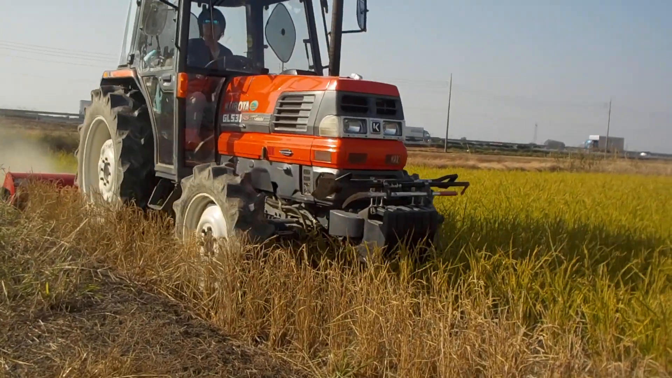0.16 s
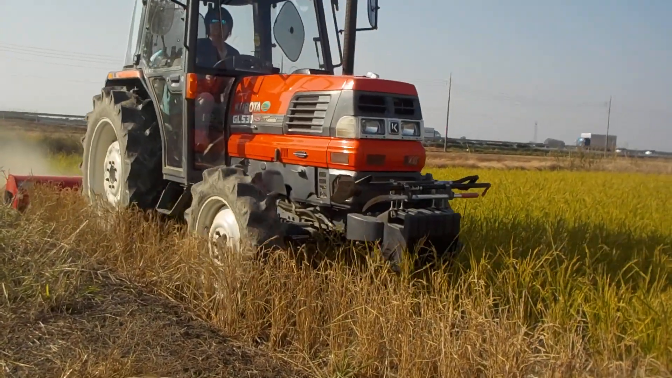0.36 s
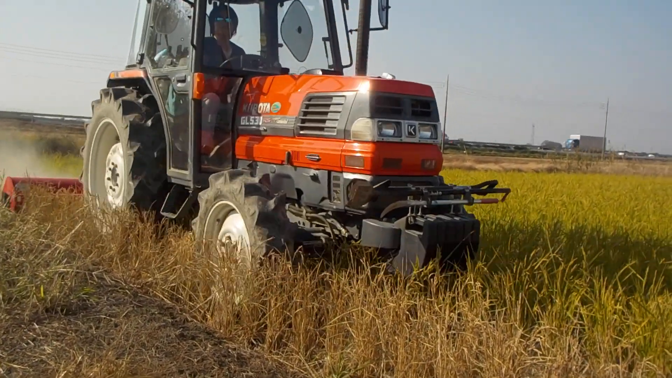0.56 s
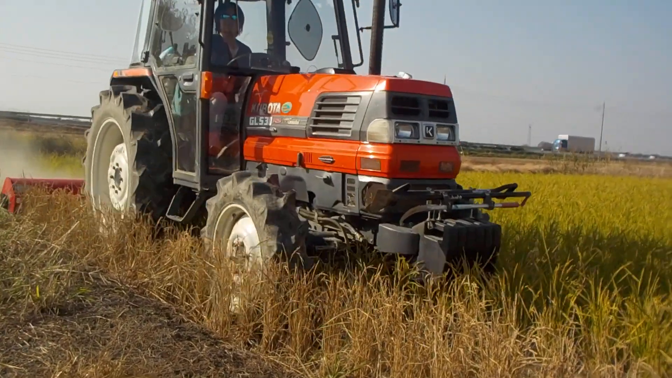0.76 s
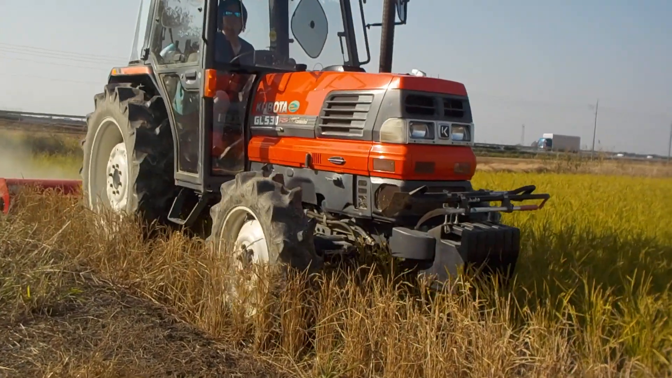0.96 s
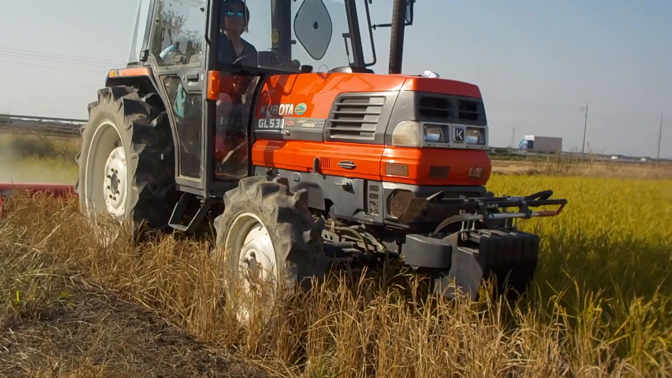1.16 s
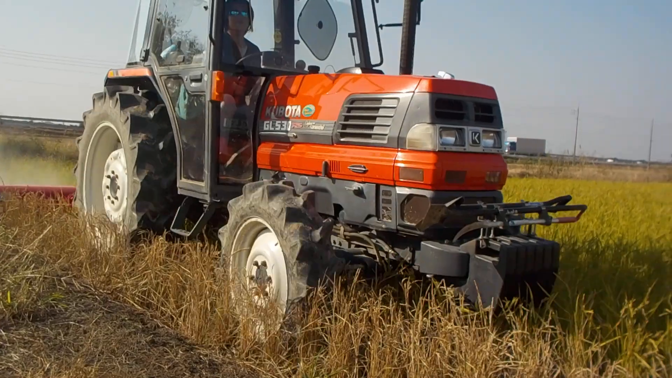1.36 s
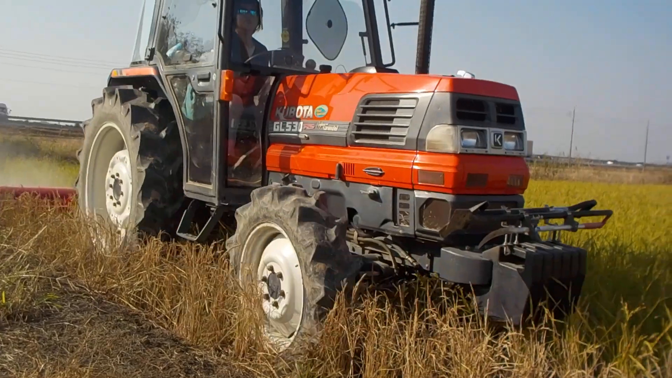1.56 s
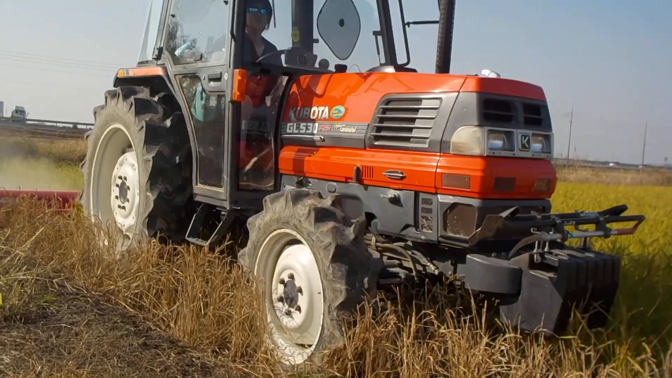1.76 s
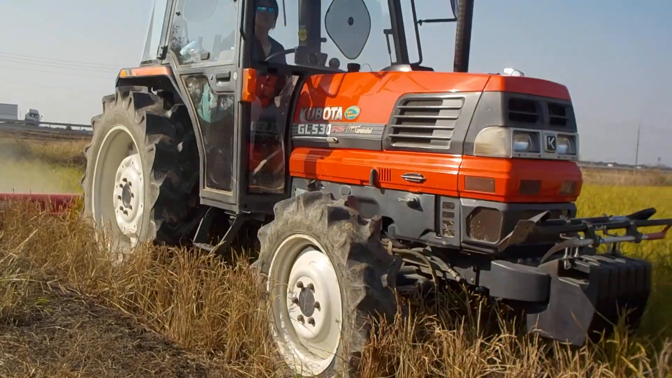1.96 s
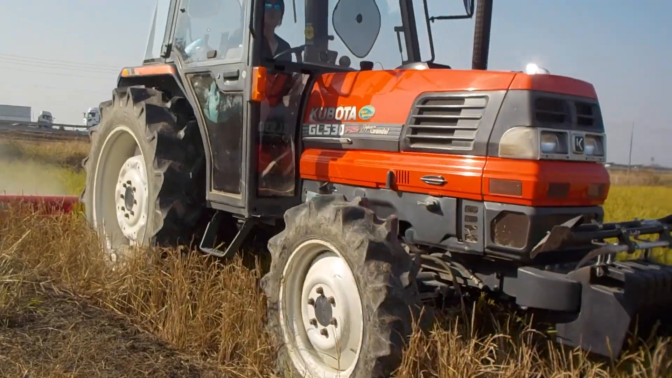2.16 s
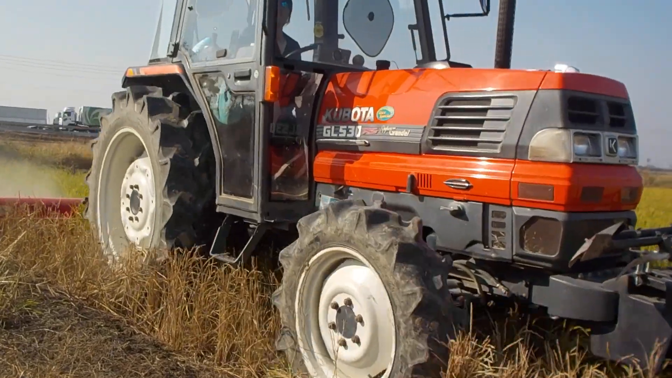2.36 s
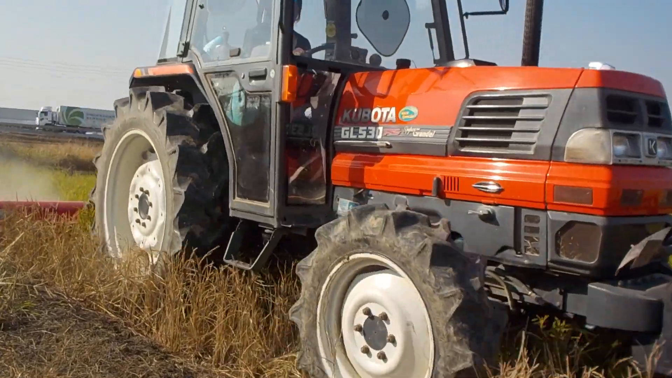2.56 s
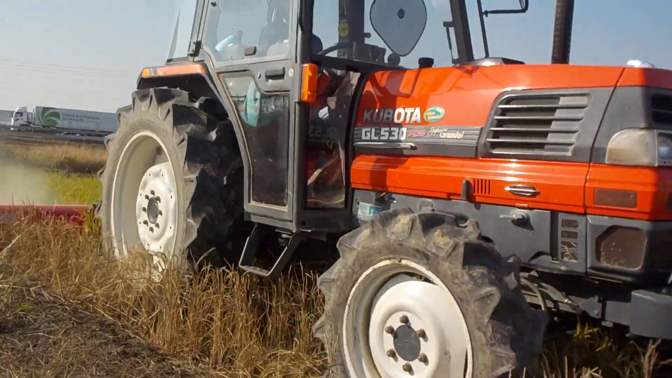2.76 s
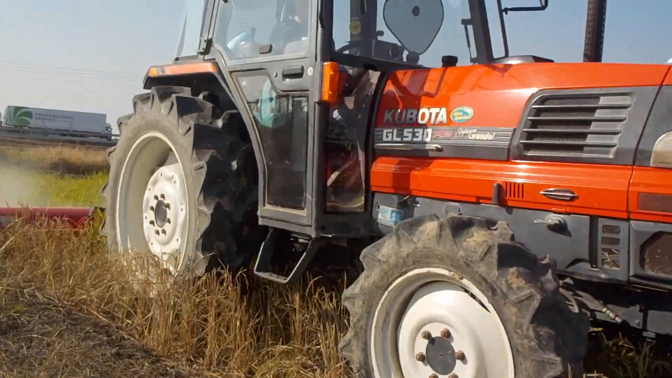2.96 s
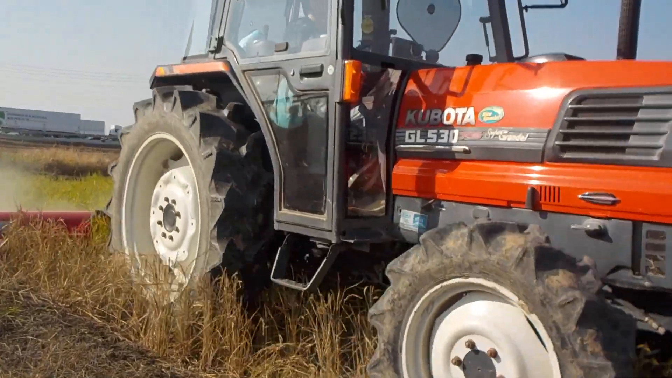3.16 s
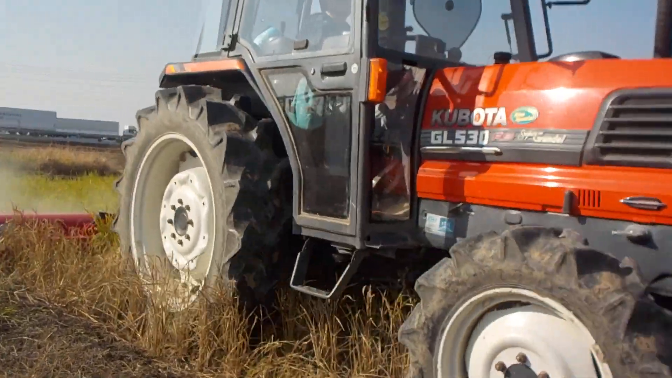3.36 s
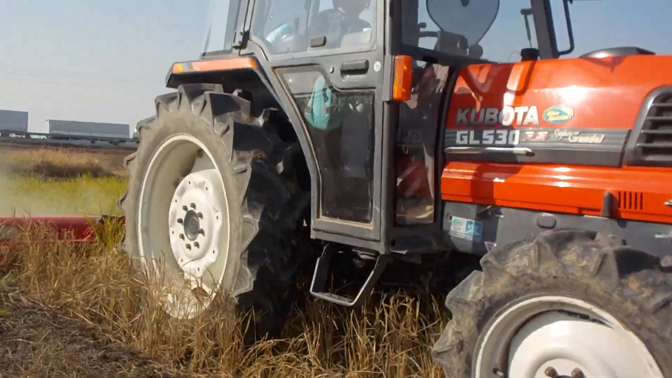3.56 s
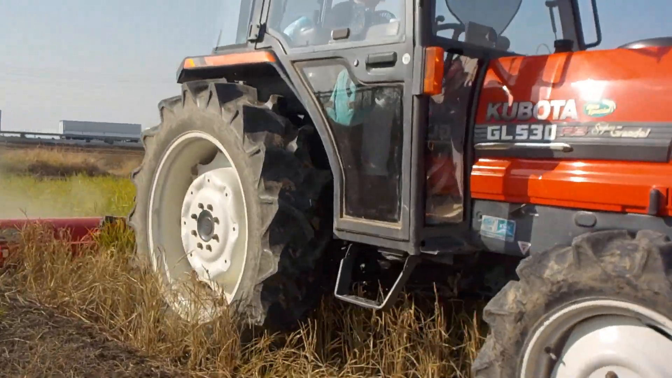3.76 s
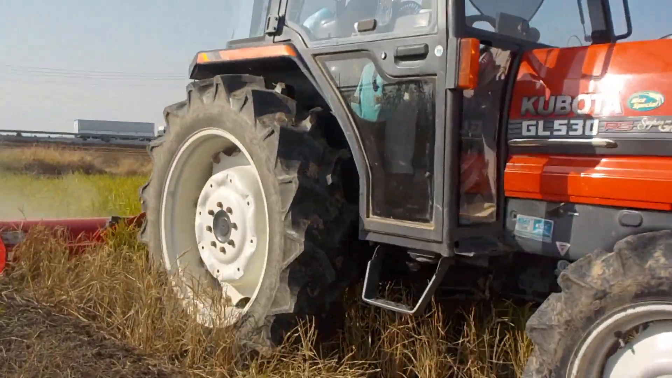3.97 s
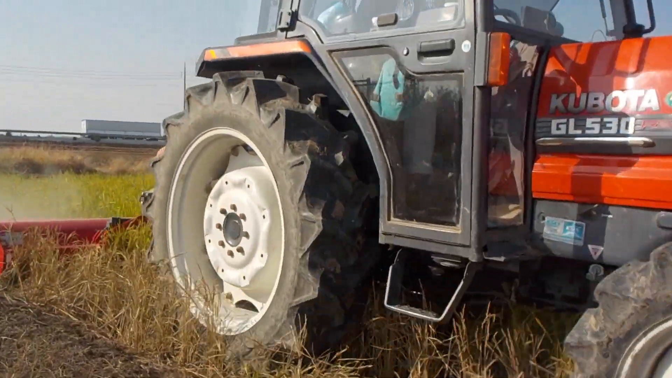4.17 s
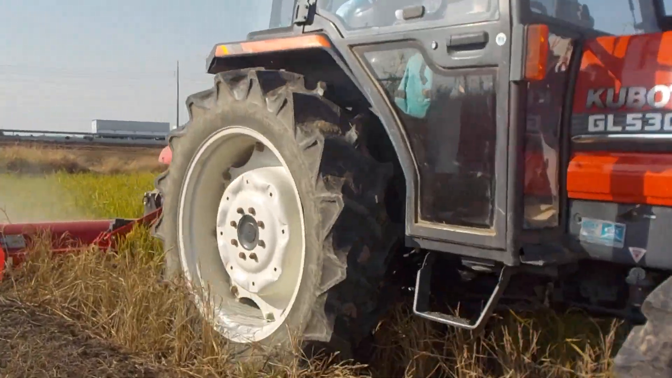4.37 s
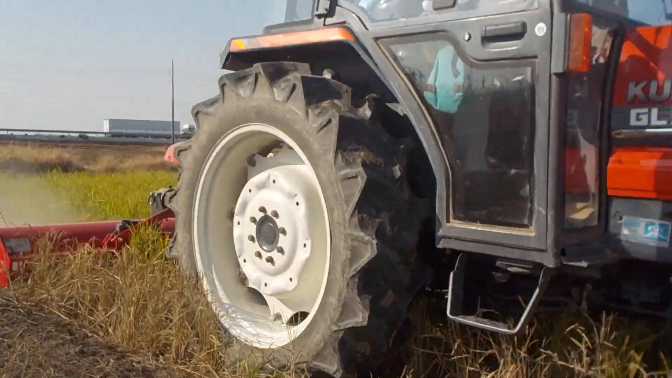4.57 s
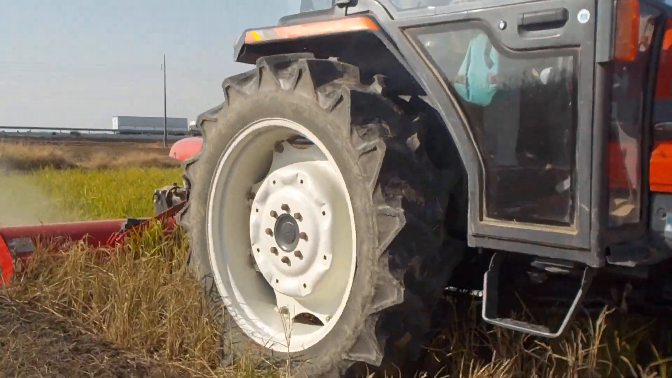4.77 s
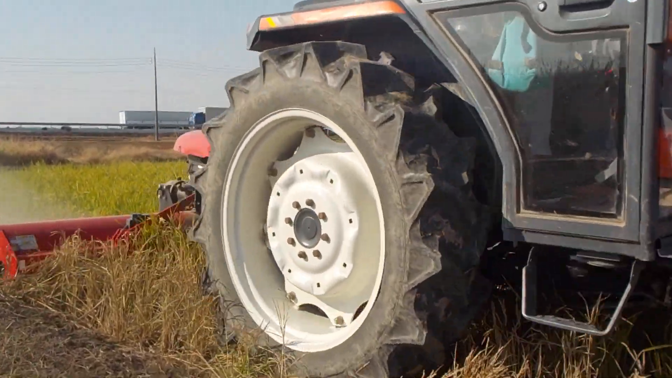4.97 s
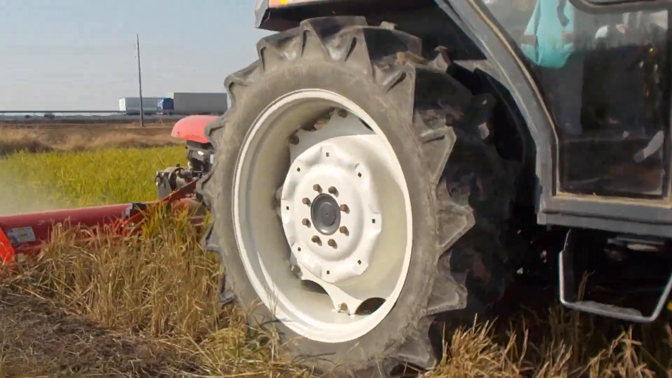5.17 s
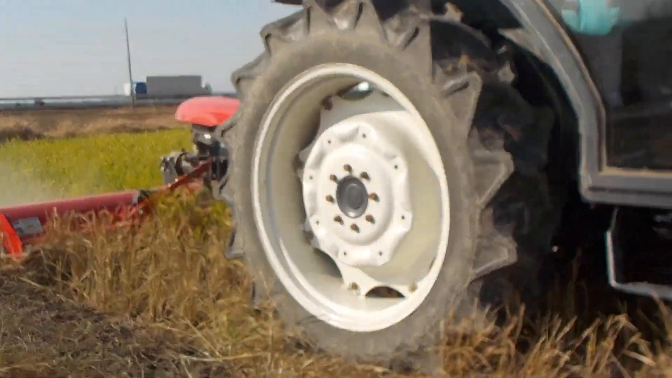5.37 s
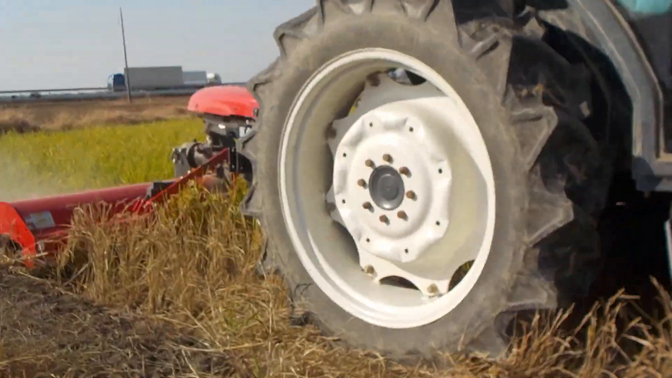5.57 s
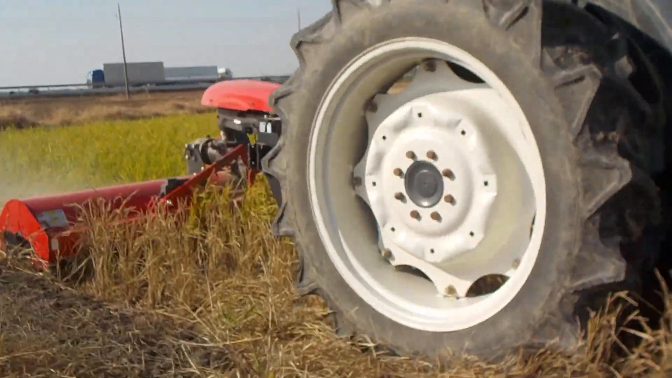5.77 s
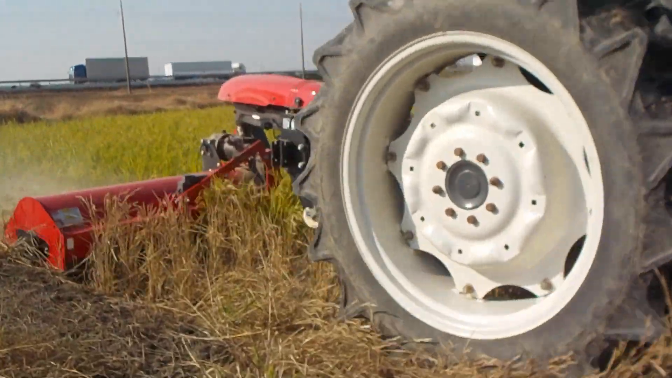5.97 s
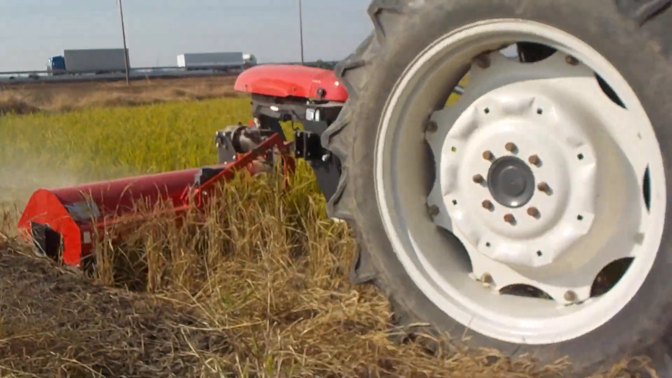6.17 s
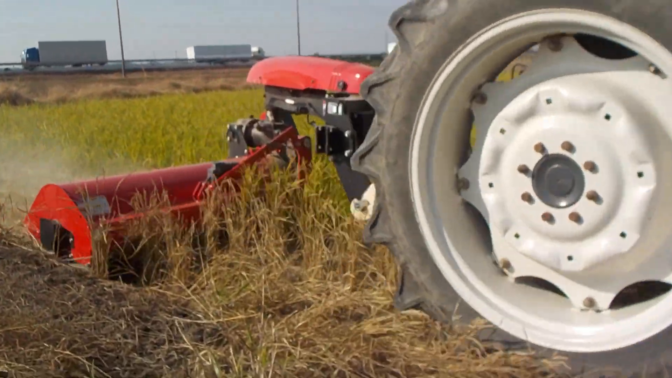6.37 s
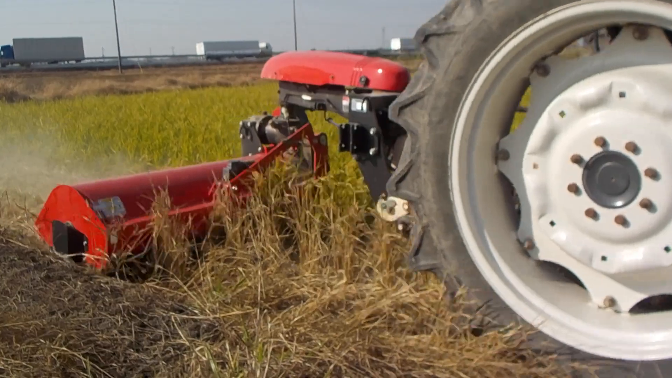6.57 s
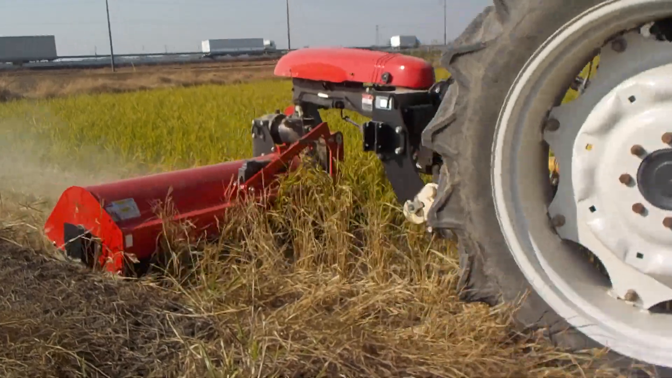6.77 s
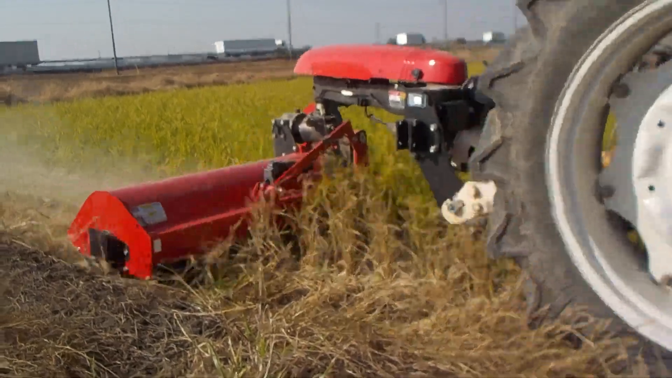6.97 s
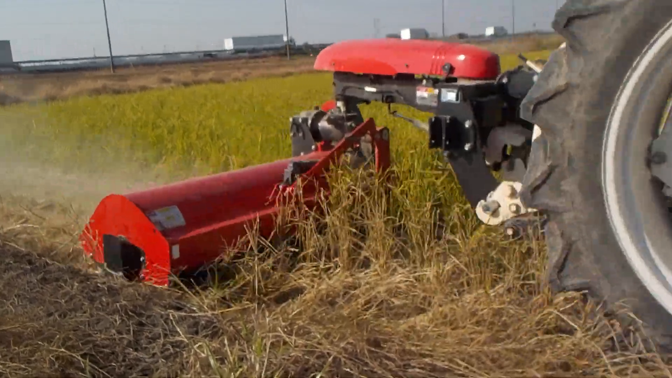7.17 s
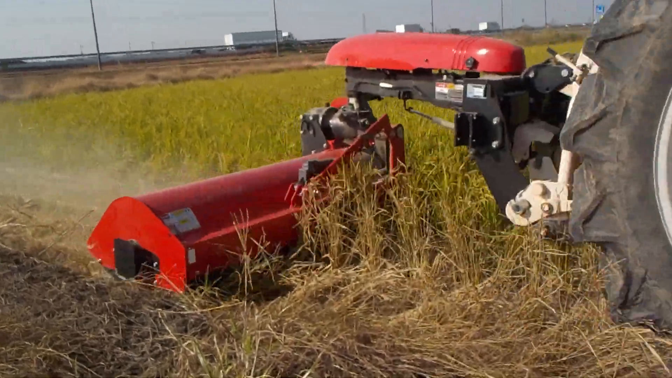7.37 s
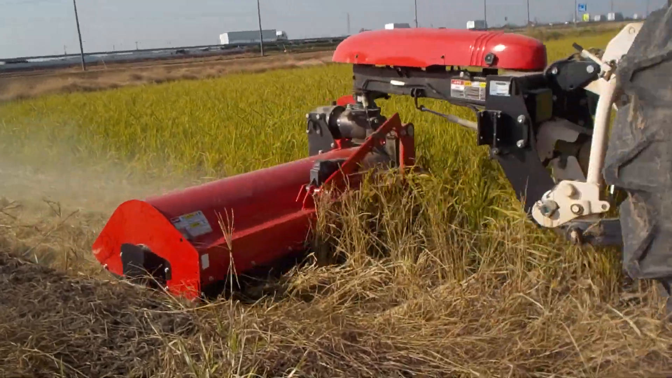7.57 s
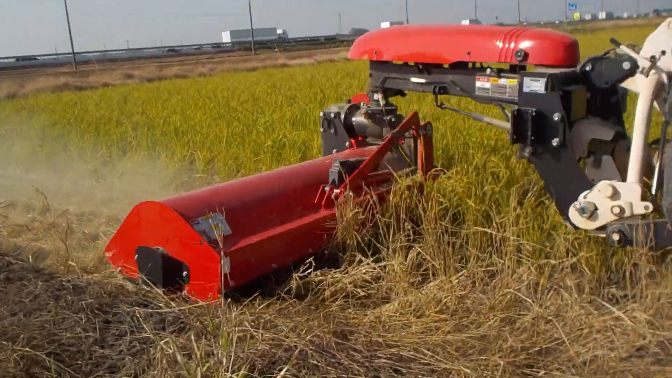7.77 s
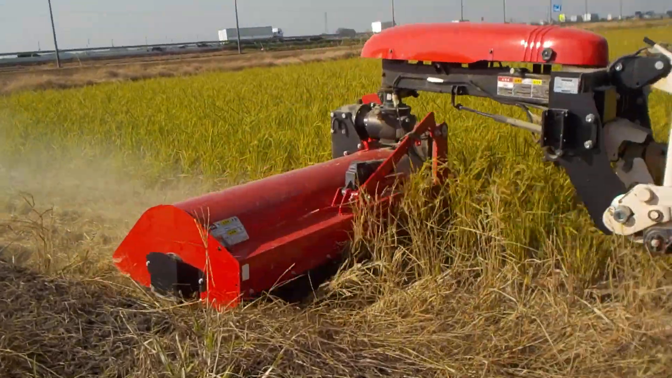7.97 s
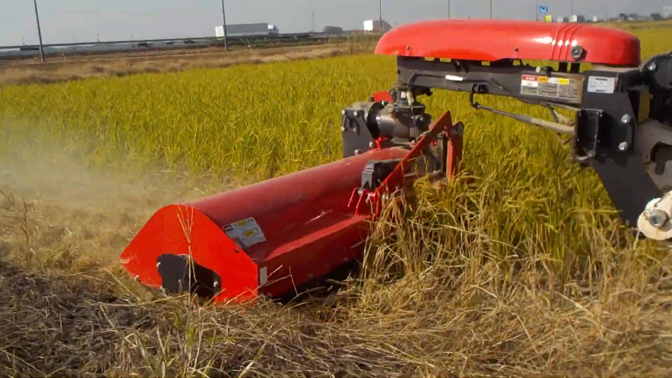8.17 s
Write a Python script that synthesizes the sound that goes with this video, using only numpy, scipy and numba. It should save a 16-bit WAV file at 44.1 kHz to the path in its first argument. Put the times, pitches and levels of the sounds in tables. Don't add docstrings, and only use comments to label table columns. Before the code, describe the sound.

A low, hollow engine drone with a fast mechanical hum comes first, the mower's thin hissing rasp behind it. As the tractor rolls by, gear tones come and go, and the shredding rises to a piercing, gritty roar with airy straw swish. Irregular sharp snaps crowd in, clipping and briefly ducking the sound. Outdoors, close handheld microphone, stereo, dry, no echo.

```python
import sys
import numpy as np
from scipy import signal
from scipy.fft import rfft, irfft, next_fast_len
from scipy.io import wavfile
from scipy.ndimage import uniform_filter1d, map_coordinates
from numba import njit

SR = 44100
rng = np.random.default_rng(int(sys.argv[2]) if len(sys.argv) > 2 else 0)


def inscribe(sig):
    pcm = np.round(np.clip(np.atleast_2d(sig).T, -1, 1) * 32767)
    wavfile.write(sys.argv[1], SR, pcm.astype(np.int16))


def field_ratio(decibels):
    return 10 ** (np.asarray(decibels, dtype=float) / 20)


N = 362943

# time in seconds, flail row rate in Hz.
ROTOR = [
    (0, 143.85),
    (1.5, 143.6),
    (3, 142.85),
    (4.5, 142.65),
    (7.3, 142.7),
    (8.23, 143.4),
]
ROW_BITE_DB = [7, 3, 4.5, 3]
# time in seconds, level in dB.
CUTTING = [(0, -30.5), (1, -28.3), (2, -26), (2.9, -25), (3.7, -24.5), (4.25, -21), (4.7, -21.5),
           (5.1, -19.5), (5.4, -20), (5.7, -18.5), (6.2, -18.9), (6.6, -18), (7.4, -19), (7.7, -19),
           (8.23, -19)]
# time in seconds, dB
BLOWS = [(0.1218, -10), (1.1504, -7.5), (1.921, -18), (2.3042, -4), (2.88, -10), (2.9034, -6.5),
         (3.2114, -6.5), (3.54, -5.5), (3.7557, -7.0), (4.0378, -2), (4.2094, 1), (4.3668, 2.1),
         (4.5144, -6), (4.5372, 0.5), (4.5713, 4.5), (4.5988, 4), (4.619, 1), (4.9, 3),
         (5.0837, 1.9), (5.127, 0), (5.2763, 0.5), (5.3227, 4), (5.35, 3.5), (5.4334, 3.5),
         (5.489, 6), (5.5177, 3), (5.679, 0.5), (5.7414, 2), (5.7975, 5), (5.8839, 0.5),
         (5.9387, -2), (5.9655, 4), (5.9941, 4.5), (6.0485, 4.2), (6.1284, 2), (6.2102, 2.5),
                   (6.2177, 1), (6.2677, 2.5), (6.3225, 0), (6.3315, 5), (6.4246, -2), (6.4852, 4),
                   (6.6377, 0), (6.7306, 1.4), (6.792, 2.5), (6.8754, 2), (7.0004, 0.5), (7.0419, -1),
                   (7.101, 4.5), (7.263, 3.5), (7.3806, 2.5), (7.4017, 2.5), (7.544, 2), (7.5987, 5.0),
                   (7.6596, 4.0), (7.7709, 2.1), (7.883, 2), (8.0168, 5), (8.1574, 4.5), (8.2126, 2.5)]
BUILD_UP = [0.28, 0.17, 0.13, 0.14, 0.13, 0.09]
# pitch in Hz, density in dB per Hz.
CHOP = [(1410, -58), (2400, -90), (2690, -35), (3000, -40), (3290, -20.5), (3730, -7), (3990, 1), (4140, 3),
        (5090, -11.5), (5980, -14.5), (6990, -13), (7370, -21.5), (7720, -34.5), (8050, -59), (8300, -51.5),
        (10800, -68), (18300, -120)]
# pitch in Hz, density in dB per Hz.
SWISH = [(4590, -32), (7800, -5.5), (8110, -18), (8610, -12), (9110, -15), (10600, 4), (11200, 4.5),
         (13700, -16), (15900, -26)]
# pitch in Hz, density in dB per Hz.
TICK = [(6000, -56), (8300, -14), (10500, -7), (12000, 2.5), (14000, 10.5), (15800, 7)]
# time in seconds, drone level in dB.
DIESEL = [(0, -37), (1.15, -35), (3.3, -33.3), (4.4, -33), (5.8, -31.5), (6.6, -32), (7.5, -33.5),
          (8.23, -31)]
# pitch in Hz, density in dB per Hz.
DRONE = [(24, -77), (40, -55), (64, -44), (113, -38), (135, -25), (168, -20.5), (296, -16), (336, -16.5),
         (411, -7.5), (684, -1), (736, -2.5), (1640, -6.5), (1970, -12), (2400, -36.5), (3100, -27.5),
         (4030, -47), (6820, -120)]
# pitch in Hz, level in dB.
ENGINE_ORDERS = [(76, -78), (108, -74), (253, -64.5), (290.7, -60), (310, -64)]
# pitch in Hz, loudest moment in seconds, half span in seconds, level in dB.
GEARS = [(698.4, 1.306, 1.6, -43.5), (645, 3.4, .9, -45), (828, 4.6, 0.65, -43.5), (906, 5.62, 1.05, -43.5),
         (588, 6.9, 1.3, -42), (416, 6.3, 1.73, -45)]
# pitch in Hz, density in dB per Hz.
HISS = [(9000, -40), (12000, -14), (13500, 0), (16000, 2)]
# pitch in Hz, left-right likeness from 0 to 1.
ALIKE = [(60, .75), (120, .88), (250, .86), (500, .993), (1000, .984), (2000, .94), (4000, .885),
         (8000, .78), (13000, .6)]
# pitch in Hz, left minus right in dB.
LEAN = [(60, -.7), (130, -3), (290, -.2), (1000, -1), (2400, 0), (4200, -1.2), (7000, 2), (12000, 1)]
# centre in Hz, half width in Hz, depth in dB.
DEAD_BANDS = [(2410, 60, -6), (2980, 120, -3), (8060, 170, -9), (8960, 80, -3)]

KNOCK_HZ, SHAFT_HZ = 146.285, 15.5
UNBALANCE_DB = .6
HUM_DB, HUM_SHARE, HOOD_DB, HOOD_SHARE, AIR_DB, AIR_SHARE = -37.5, 0.66, -12.5, 0.64, -32, 0.98
TURN_S, TURN_LOSS_DB, DRIFT_DB = 6.5, 1.5, -.12
ROAR_SHARE, ROAR_TOP_HZ = .45, 4700
CEILING_DB, BLOW_GROWS = -3.5, 0.77
RING_HZ = 4150
CRACK, CRACK_HZ = .9, 4900
TICK_DB, TICK_GROWS = -44.5, 3.6
GEAR_FALL_DB = 6
HISS_DB = -70
WIND_CUT_HZ, TOP_HZ = 28, 15800


def unit(x):
    return x / np.sqrt(np.mean(x ** 2) + 1e-20)


def along(points, hz):
    f, v = np.transpose(points)
    return np.interp(np.log(hz + 1), np.log(f + 1), v)


def curves(rows):
    s, *cols = np.transpose(rows)
    t = np.arange(N) / SR
    return [np.interp(t, s, c) for c in cols]


def wobble(rate):
    knots = rng.standard_normal(int(N * rate / SR) + 4)
    return map_coordinates(knots, [np.arange(N) * rate / SR])


def follower(offset_db, share):
    chop_db, = curves(CUTTING)
    return chop_db.mean() + offset_db + share * (chop_db - chop_db.mean())


def causal(spectrum, size=4096):
    level = field_ratio(along(spectrum, np.fft.rfftfreq(size, 1 / SR)))
    cepstrum = irfft(np.log(level + 1e-6))
    cepstrum[1:size // 2] *= 2
    cepstrum[size // 2 + 1:] = 0
    return irfft(np.exp(rfft(cepstrum)))


def coloured(pair, spectrum):
    size = next_fast_len(N + 8192)
    hz = np.fft.rfftfreq(size, 1 / SR)
    turn = np.arccos(np.clip(along(ALIKE, hz), -1, 1)) / 2
    body = rfft(causal(spectrum), size)
    mid, side = rfft(pair, size) * body * [np.cos(turn), np.sin(turn)]
    lean = field_ratio(along(LEAN, hz) / 2)
    return irfft([(mid + side) * lean, (mid - side) / lean], size)[:, :N]


def patchy(depth_db):
    z = signal.stft(rng.standard_normal((2, N)), nperseg=512)[2]
    field = uniform_filter1d(rng.standard_normal(z.shape[1:]), size=4, axis=0)
    field = uniform_filter1d(field, size=12, axis=1)
    return signal.istft(z * field_ratio(depth_db * unit(field)), nperseg=512)[1][:, :N]


def spikes(times, db, sides):
    out = np.zeros((2, N))
    out[:, np.round(times * SR).astype(int)] = field_ratio(db) * sides
    return out


def flails():
    passes = np.cumsum(curves(ROTOR)[0]) / SR + 2.86
    passes = passes + 0.16 * wobble(25)
    t = np.arange(N) / SR
    row = np.floor(passes).astype(int).clip(0)
    luck = rng.standard_normal(row.max() + 1).clip(-3, 1.6)
    density = np.clip(1 + .4 * wobble(1.5), 0, 2)
    bite_db = np.take(ROW_BITE_DB, row % 4) * density + 2 * luck[row]
    bites = 0.4 * field_ratio(bite_db) * np.abs(np.sin(np.pi * passes)) ** 6.2
    knock = np.sin(np.pi * KNOCK_HZ * (t - .00237)) ** 4
    knock = knock * field_ratio(-13 + 2 * wobble(1.51)) * (t - 1.5).clip(0, 1)
    unbalance_db = UNBALANCE_DB * np.cos(np.pi / 2 * (passes - .7))
    return (1 + bites + knock) * field_ratio(unbalance_db)


def snaps(rate, spread_db):
    hit = rng.random(N) < rate / SR
    size = np.minimum(rng.exponential(size=N), 3)
    return hit * field_ratio(spread_db * size) * rng.standard_normal((2, N))


def blows():
    return np.transpose(BLOWS)


def mower():
    chop_db, = curves(CUTTING)
    t = np.arange(N) / SR
    swish_db = follower(AIR_DB, AIR_SHARE) - TURN_LOSS_DB * (t - TURN_S).clip(0)
    pan_db = DRIFT_DB * t
    throb_db = np.cos(2 * np.pi * SHAFT_HZ * (t - .249)) * np.interp(t, [2.5, 5], [1.5, .2])
    bite = flails() * field_ratio(throb_db + 0.49 * wobble(9.7))
    stalks = 0.22 * unit(snaps(rate=1100, spread_db=3.5))
    straw = unit(bite * (patchy(depth_db=0.75) + stalks))

    blend = (np.sqrt(1 - ROAR_SHARE) - 1) * straw
    blend = blend + np.sqrt(ROAR_SHARE) * field_ratio(throb_db) * patchy(depth_db=0.4)
    roar = signal.sosfiltfilt(signal.butter(4, ROAR_TOP_HZ, fs=SR, output="sos"), blend)

    at, over_db = blows()
    peak_db = CEILING_DB + np.minimum(over_db, BLOW_GROWS * over_db)
    ring_peak = np.abs(causal(CHOP)).max()
    hits = spikes(at - .0004, peak_db + 2.5, [[1], [.8]]) / ring_peak
    crack = CRACK * signal.sosfilt(signal.butter(3, CRACK_HZ, "high", fs=SR, output="sos"), hits)
    hits = sum(share * np.roll(hits, -round(k * SR / RING_HZ), axis=1) for k, share in enumerate(BUILD_UP))

    chop = field_ratio(chop_db + 1.08) * unit(coloured(straw + roar, CHOP))
    chop = chop + coloured(hits + crack, CHOP)
    air = coloured(straw / field_ratio(throb_db), SWISH)
    hit_air = 4.8 * coloured(hits * ring_peak / field_ratio(chop_db), SWISH)
    swish = field_ratio(swish_db + 2.0) / air.std() * (air + hit_air)
    return (chop + swish) * field_ratio(np.outer([.5, -.5], pan_db - pan_db.mean()))


def overload():
    at, over_db = blows()
    tick_db = TICK_DB + TICK_GROWS * np.minimum(over_db, 2 * over_db)
    luck = rng.standard_normal((len(at), 2)).T
    sides = field_ratio(4 * luck.clip(-2, 1) + [[-3], [3]])
    ticks = spikes(at - .00005, tick_db + 14.5, sides)
    ticks += 0.49 * np.roll(ticks, -5, axis=1) - .5 * np.roll(ticks, 6, axis=1)
    return signal.fftconvolve(ticks, causal(TICK)[None], axes=1)[:, :N]


def tone(hz, db, drift_hz, flutter_db):
    phase = 2 * np.pi * np.cumsum(hz + drift_hz * wobble(12)) / SR
    return np.sqrt(2) * field_ratio(db + flutter_db * wobble(9)) * np.sin(phase)


def whine(hz, at, span, db):
    speed, = curves(ROTOR)
    speed_then = np.interp(at, *np.transpose(ROTOR))
    fall_db = GEAR_FALL_DB * ((np.arange(N) / SR - at) / span) ** 4
    return tone(hz * speed / speed_then, db - fall_db, drift_hz=4, flutter_db=3)


def tractor():
    low_db, = curves(DIESEL)
    high_db = follower(HOOD_DB, HOOD_SHARE)
    drone = unit(coloured(patchy(depth_db=0.76), DRONE))
    bounce = np.interp(np.arange(N) / SR, [1.5, 4.5], [.3, .02])
    drone = drone - bounce * np.roll(drone, round(SR / 625), axis=1)
    high = signal.sosfiltfilt(signal.butter(2, 1000, "high", fs=SR, output="sos"), drone)
    body = field_ratio(low_db - 1.97) * unit(drone - high) + field_ratio(high_db + 0.58) * unit(high)

    near_db = uniform_filter1d(low_db - low_db.mean(), SR)
    tones = sum(tone(hz, db + near_db, drift_hz=1.27, flutter_db=2.5) for hz, db in ENGINE_ORDERS)
    tones += tone(*curves(ROTOR), follower(HUM_DB, HUM_SHARE), drift_hz=0.4, flutter_db=2.1)
    tones += sum(whine(*gear) for gear in GEARS)
    return body + tones


def hiss():
    return field_ratio(HISS_DB) * unit(coloured(rng.standard_normal((2, N)), HISS))


def scene():
    return mower() + tractor() + hiss()


@njit
def stepped_gain(peak, top, attack, recover):
    gain, g = np.empty(len(peak)), 1.0
    for i in range(len(peak)):
        g += (1 - g) * recover
        if peak[i] * g > top:
            g -= (g - top / peak[i]) * attack
        gain[i] = g
    return gain


def top_cut(x):
    return signal.sosfilt(signal.butter(12, 16830, fs=SR, output="sos"), x)


def record(dry):
    crest = np.abs(signal.hilbert(dry, next_fast_len(N)))[:, :N].max(axis=0)
    gain = stepped_gain(crest, field_ratio(-6.0), 0.17, 1 / (0.026 * SR))
    gain = uniform_filter1d(gain, size=16)
    hz = np.fft.rfftfreq(N, 1 / SR)
    port = field_ratio(sum(depth_db / (1 + ((hz - centre) / width) ** 6) for centre, width, depth_db in DEAD_BANDS))
    wind_cut = hz ** 2 / (hz ** 2 + WIND_CUT_HZ ** 2)
    heard = rfft(dry * gain) * port * wind_cut + rfft(overload())
    return top_cut(irfft(heard * (hz < TOP_HZ), N))


dry = scene()
out = record(dry)
inscribe(out)
```